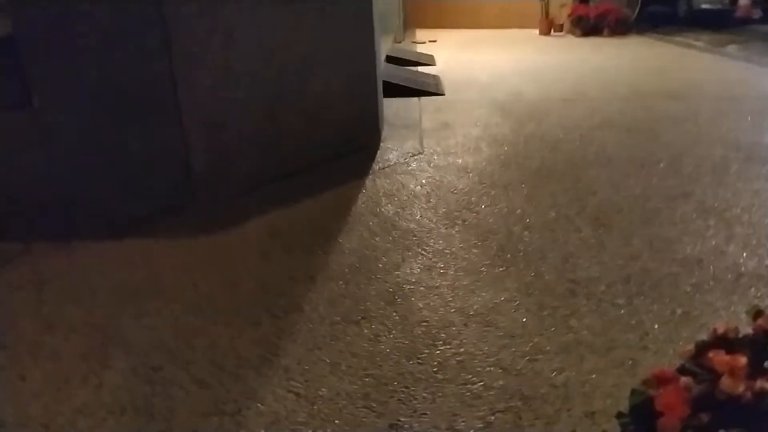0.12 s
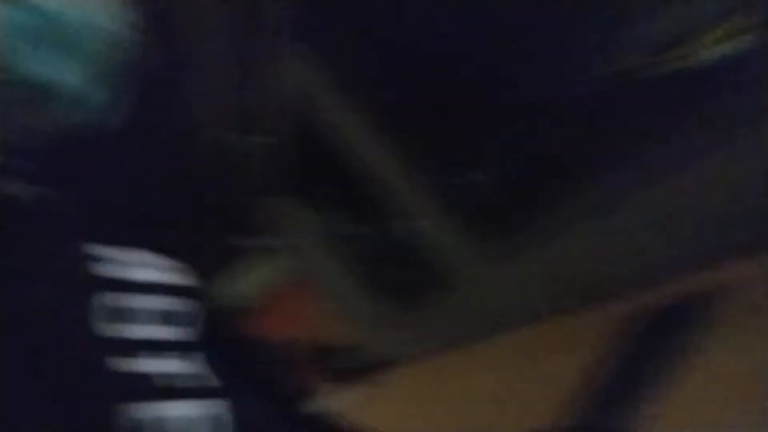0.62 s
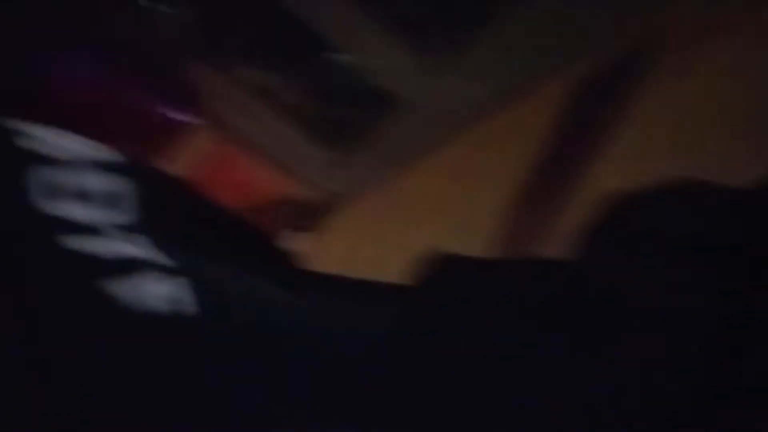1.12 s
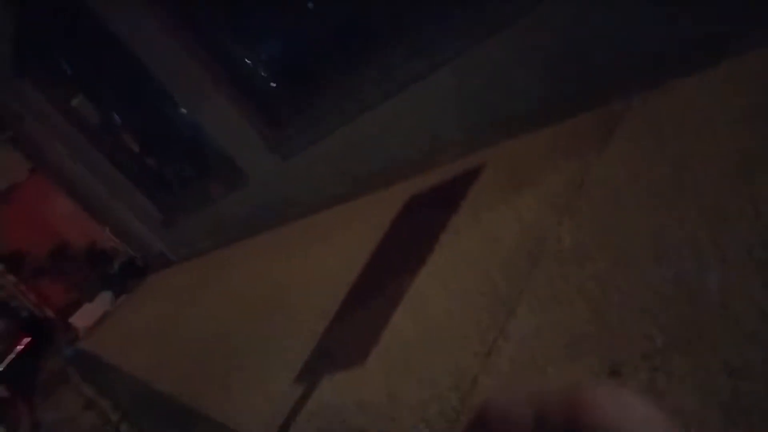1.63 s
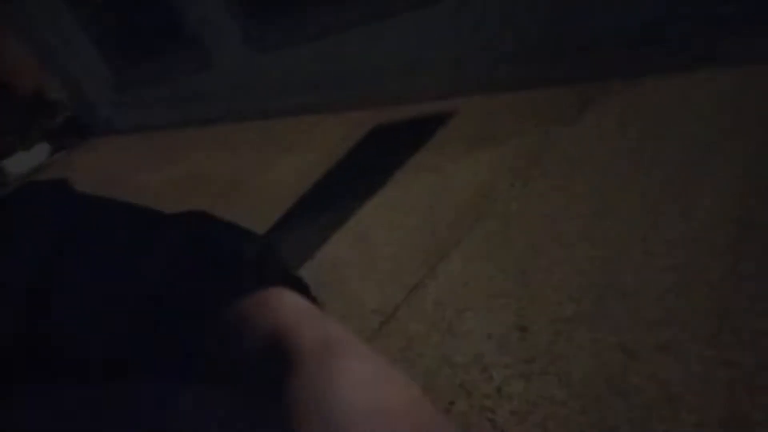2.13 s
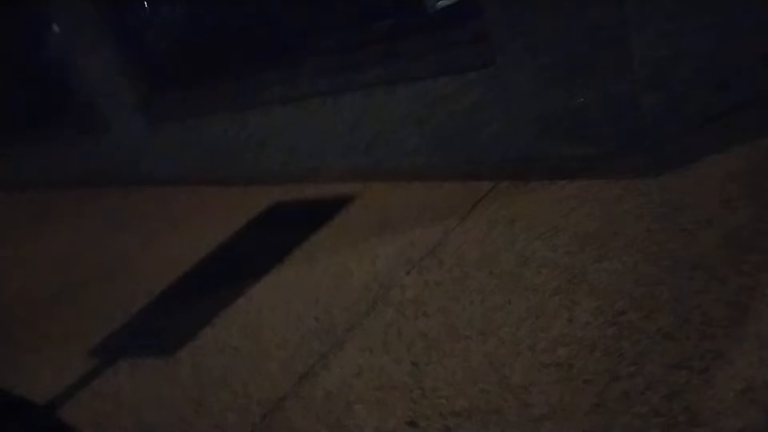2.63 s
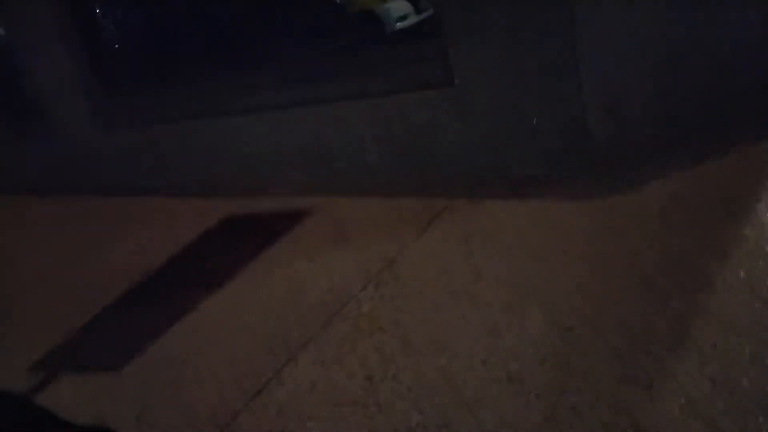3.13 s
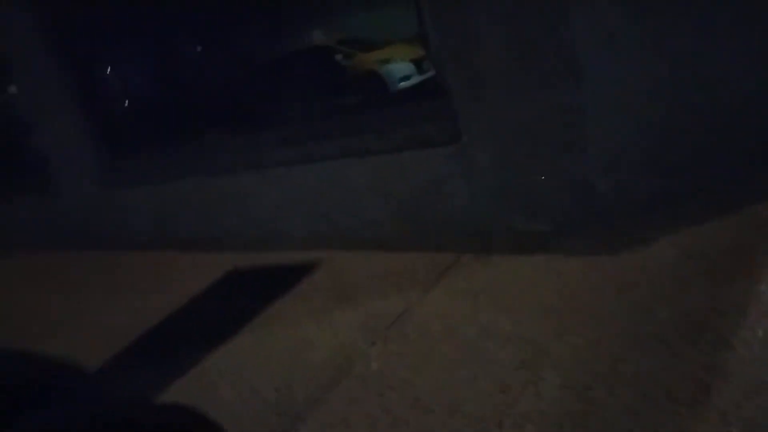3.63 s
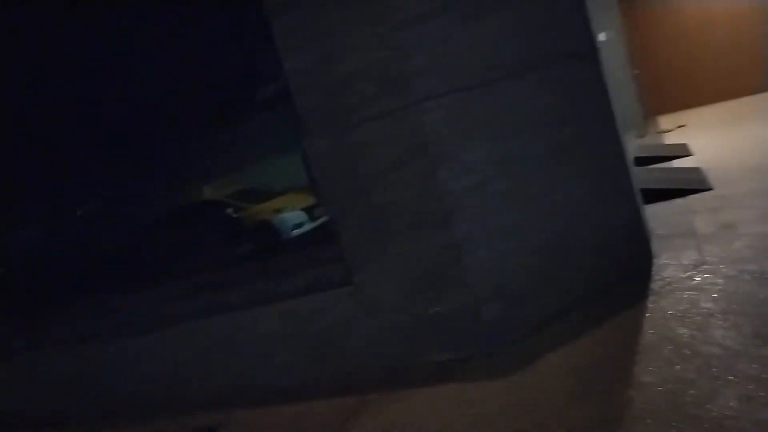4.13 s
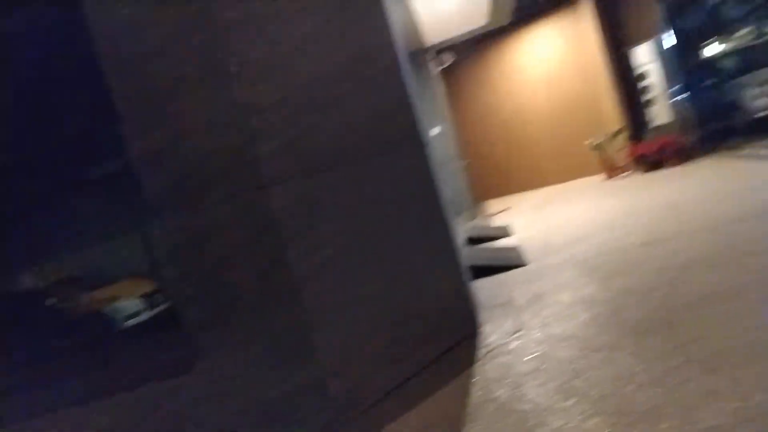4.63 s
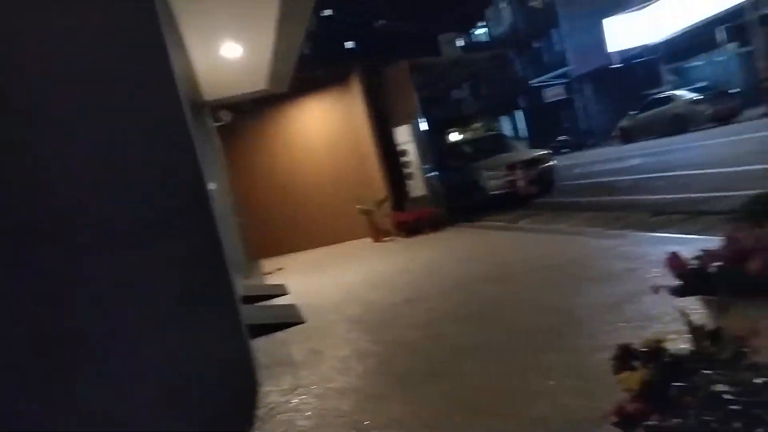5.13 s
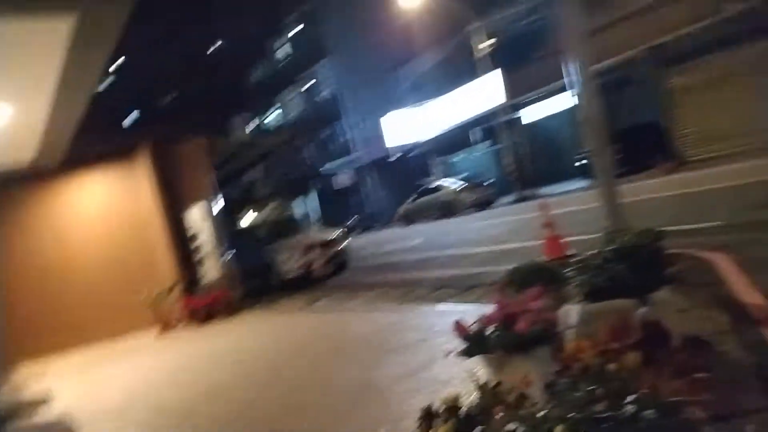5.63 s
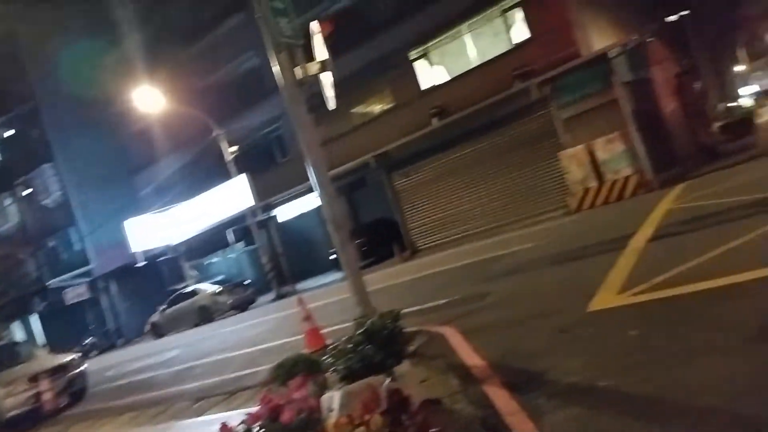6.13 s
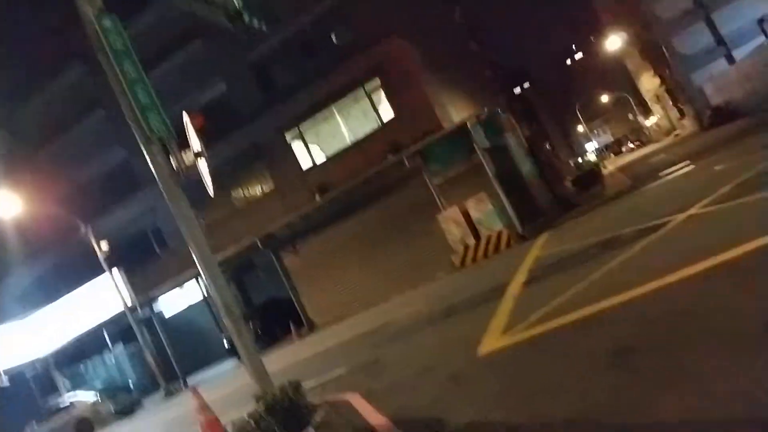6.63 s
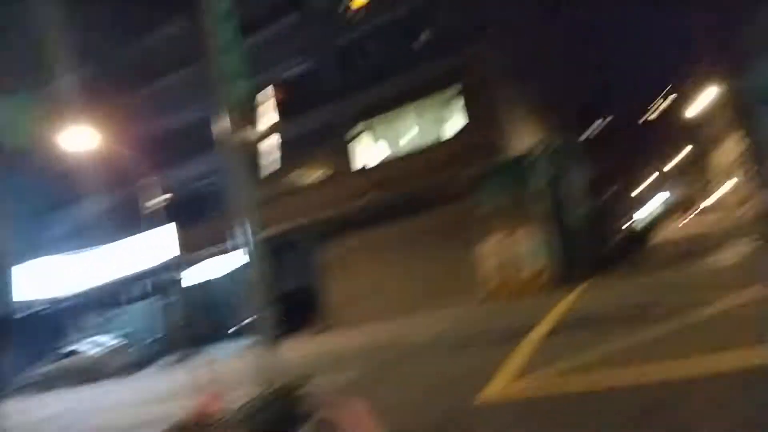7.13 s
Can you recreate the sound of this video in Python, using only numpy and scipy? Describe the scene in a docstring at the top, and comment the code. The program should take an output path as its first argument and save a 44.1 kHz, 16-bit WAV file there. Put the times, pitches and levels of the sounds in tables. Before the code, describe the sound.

Close cloth scraping and brushing, hard taps on a phone case and one hollow clasp clack, above a quiet street's distant low noise.

```python
"""Cloth and a bag rustle and scrape as a phone is carried by hand in a quiet street at night: friction noise in strokes.
The hand knocks on the case (damped modes) and creaks; folds snap (noise bursts around single cracks).
A clasp clacks (rattled modes), skin squeaks once (a rough upward glide), and air thumps on two microphone
ports (low noise). Behind lie a thin whine (a wavering sine) and distant traffic and fans (smooth noise)."""
import sys
import numpy as np
from scipy import signal
from scipy.fft import rfft, irfft, next_fast_len
from scipy.io import wavfile
from scipy.ndimage import uniform_filter1d

SR = 44100
rng = np.random.default_rng(int(sys.argv[2]) if len(sys.argv) > 2 else 0)


def output_pcm(signal):
    """Save a mono or channel-first signal as 16-bit PCM at the path in sys.argv[1].

    Samples are clipped to [-1, 1] before scaling.
    """
    pcm = np.clip(np.atleast_2d(signal).T, -1, 1) * 32767
    wavfile.write(sys.argv[1], SR, np.round(pcm).astype(np.int16))


def natural_amplitude(level_db):
    """Convert a level in decibels to a linear amplitude factor, elementwise."""
    exponent = np.asarray(level_db, float) / 20
    return 10 ** exponent


N = 320163  # length of the scene in samples

# Modes of the phone case: (frequency [Hz], level [dB], t60 [s])
CASE_MODES = [(321.5, -5, 0.15), (520, -1, 0.11), (764, -13.5, 0.15)]
# How the phone is turned to the clothes: (time [s], lag of left port [samples], left minus right [dB])
PHONE_TURN = [(0, 16, -4), (1.2, 25, -9), (1.7, -6, -7), (2.2, 9, -5.5), (3.3, -0.5, -0.5), (4.2, -4.5, -4),
              (5.7, -14, 2.5), (7.2, 11, -9.5)]


def evened(x):
    """Normalisation: scales to an rms of 1."""
    return x / np.sqrt(np.mean(x ** 2) + 1e-20)


def curve(rows, size=N):
    """Linear interpolation: every column of a time table at size even steps."""
    times, *columns = np.transpose(rows)
    steps = np.linspace(0, N / SR, size)
    return [np.interp(steps, times, column) for column in columns]


def read(points, hz):
    """Spectral interpolation: reads a table on a log-frequency axis."""
    frequency, value = np.transpose(points)
    return np.interp(np.log(hz + 1), np.log(frequency + 1), value)


def sides(balance_db):
    """Intensity stereo: gains of the left and right port, left minus right being balance_db."""
    return natural_amplitude(np.array([balance_db, -balance_db]) / 2)


def add(mix, start_s, sound):
    """Superposition: adds a two-port sound into the mix from start_s on."""
    part = mix[:, round(start_s * SR):][:, :sound.shape[1]]
    part += sound[:, :part.shape[1]]


def coloured(x, gain_db):
    """Linear filtering: multiplies the spectrum by a function of frequency giving dB."""
    size = next_fast_len(x.shape[-1])
    gain = natural_amplitude(gain_db(np.fft.rfftfreq(size, 1 / SR)))
    return irfft(rfft(x, size) * gain, size)[..., :x.shape[-1]]


def ring(hz, t60, rise):
    """Damped oscillation: one mode dying by 60 dB in t60 s, with a soft start of time constant rise s."""
    t = np.arange(SR // 5) / SR
    decay = natural_amplitude(-60 * t / max(t60, 0.005))
    return decay * (1 - np.exp(-t / rise)) * np.sin(2 * np.pi * hz * t)


def flicker(size, depth_db):
    """Random modulation: a gain that wanders by chance, holding for about size samples."""
    smooth = uniform_filter1d(rng.standard_normal(N), size)
    smooth = uniform_filter1d(smooth, size)
    return natural_amplitude(depth_db * evened(smooth))


def ports(alike, a, b):
    """Partial coherence: the left port hears the right one's sound late or early, plus its own."""
    lag = np.round(curve(PHONE_TURN)[0])
    late = np.interp(np.arange(N) - lag, np.arange(N), a)
    alike = np.clip(alike, 0, 1)
    left = alike * late + np.sqrt(1 - alike ** 2) * b
    return np.array([left, a])


def crackle(per_s, spread_db, share):
    """Stick-slip friction: smooth noise plus many tiny ticks as fibres let go, a few of them large."""
    heights = natural_amplitude(spread_db * np.minimum(rng.exponential(1, (2, N)), 5))
    ticks = (rng.random((2, N)) < per_s / SR) * heights
    puff = np.exp(-np.arange(120) / 11.4) * rng.standard_normal(120)
    grains = signal.oaconvolve(ticks, puff[None], axes=1)[:, :N]
    return rng.standard_normal((2, N)) + share * evened(grains)


def patchy(x, spectrum):
    """Time-varying filtering: colours x while patches of about 1 kHz by 30 ms swell and sink."""
    hz, _, z = signal.stft(x, SR, nperseg=256, noverlap=192)
    patches = uniform_filter1d(rng.standard_normal(z.shape[1:]), size=6, axis=0)
    patches = evened(uniform_filter1d(patches, size=20, axis=1))
    gain = natural_amplitude(read(spectrum, hz)[:, None] + 2 * patches)
    return evened(signal.istft(z * gain, SR, nperseg=256, noverlap=192)[1][:, :N])


def friction():
    """Energy addition: the powers of steady sliding and of each swelling stroke sum to two gains."""
    # Steady sliding of cloth: (time [s], hiss level [dB], scraping level [dB])
    sliding = [(0, -56.5, -54), (0.5, -50.5, -77), (1.23, -59.5, -91), (1.4, -44.5, -57),
               (2.12, -51, -55.5), (3.1, -42, -46), (3.29, -46.5, -58.5), (3.75, -45, -53.5),
               (4.9, -51.5, -62), (5.95, -55, -54), (6.35, -45, -51), (7.26, -66, -67)]
    # Strokes of cloth and hand: (time of peak [s], length [s], hiss level [dB], scraping level [dB])
    strokes = [(0.639, 0.16, -44, -62), (1.339, 0.25, -65, -44), (1.481, 0.098, -39, -52),
               (1.785, 0.09, -48, -41), (2.156, 0.05, -28, -28), (2.22, 0.06, -32, -34.5),
               (2.29, 0.28, -42.5, -41), (2.676, 0.41, -37.5, -42.5), (2.896, 0.19, -34.5, -39.5),
               (2.956, 0.12, -30, -31), (3.169, 0.054, -29.5, -37), (3.39, 0.24, -42.5, -45),
               (3.682, 0.41, -49.5, -45), (3.966, 0.19, -40.5, -38.5), (4.087, 0.22, -39.5, -48),
               (4.446, 0.15, -44, -40.5), (4.546, 0.16, -40, -42), (5.115, 0.16, -53, -46),
               (5.342, 0.19, -41, -41), (5.524, 0.1, -30, -34), (5.777, 0.23, -46.5, -69),
               (6.248, 0.089, -42, -39.5), (6.881, 0.29, -42, -46), (7.07, 0.28, -51, -54)]
    swell_share, ends_db = 0.48, -28.5  # share of length spent swelling; level at both ends re peak
    t = np.arange(N) / SR
    power = natural_amplitude(np.array(curve(sliding))) ** 2
    for peak_s, length, *levels_db in strokes:
        near = slice(round((peak_s - length) * SR), round((peak_s + length) * SR))
        flank = np.where(t[near] < peak_s, -swell_share, 1 - swell_share)
        away = (t[near] - peak_s) / length / flank  # 0 at the peak, 1 at either end
        stroke_db = np.array(levels_db)[:, None] + ends_db * away ** 1.47
        power[:, near] += natural_amplitude(stroke_db) ** 2
    return np.sqrt(power)


def rustle():
    """Friction noise: sliding cloth hisses in strokes, almost unlike at the two ports."""
    # Fine hiss of cloth: (frequency [Hz], relative level [dB per Hz])
    cloth = [(2500, 2.5), (8500, 12), (11900, 10), (14000, -8)]
    sound = patchy(ports(0.057, *crackle(1200, 5.0, 0.2)), cloth)
    hiss_gain = friction()[0]
    return sound * flicker(size=300, depth_db=2.0) * hiss_gain * sides(curve(PHONE_TURN)[1])


def rubbing():
    """Forced vibration: gritty scraping of cloth and skin over the case also shakes its modes."""
    # Grit of the scraping: (frequency [Hz], relative level [dB per Hz])
    scrape = [(120, -13), (300, 14), (800, 15), (2200, 7.5), (5000, 0.5), (7500, -45), (16000, -49)]
    # the case dies away faster here than when knocked
    body = sum(natural_amplitude(db) * ring(hz, 0.14 * t60, 0.018) for hz, db, t60 in CASE_MODES)
    drive = ports(0.19, *crackle(400, 3.74, 0.95)) * flicker(size=250, depth_db=3.0)
    modes = signal.oaconvolve(drive, body[None] - body.mean(), axes=1)[:, :N]
    sound = patchy(drive, scrape) + 0.89 * evened(modes)
    scraping_gain = friction()[1]
    return sound * scraping_gain * sides(curve(PHONE_TURN)[1])


def case_response(luck):
    """Modal superposition: all case modes, their levels and pitches varied by chance."""
    modes = zip(CASE_MODES, luck)
    return sum(natural_amplitude(db + 3 * r) * ring(hz * (1 + r / 30), t60, 0.003) for (hz, db, t60), r in modes)


def knocks():
    """Impact excitation: a chattering contact rings the struck spot and, behind it, the case modes."""
    # Knocks: (time [s], two-port mean peak before balance [dB], pitch of spot [Hz], left minus right [dB])
    knock_rows = [(0.743, -39, 322, -4), (1.253, -37.5, 240, -16.5), (1.638, -28.5, 424, -7),
                  (1.756, -16.5, 693, -10), (2.1419, -28, 520, -8), (2.162, -13.5, 546, -3),
                  (2.167, -22, 470, -20), (2.177, -19, 520, 8), (2.249, -25.5, 285, -9),
                  (2.387, -33, 290, -18), (2.5746, -26.5, 297, -15.5), (2.598, -21.5, 294, -16),
                  (2.675, -30.5, 239, -15.5), (2.6895, -25.5, 980, -16), (2.763, -32.5, 326, -15),
                  (2.937, -19, 280, -7), (2.9768, -23, 320, -2), (3.048, -30.5, 290, -8),
                  (3.1714, -12, 610, 9), (3.1765, -21, 342, -5), (3.5817, -29.5, 503, -11),
                  (3.6753, -26, 322, -13.5), (4.376, -29, 370, -11), (4.386, -29, 452, -12.5),
                  (4.4601, -17, 520, -11), (4.465, -25, 740, -9), (4.909, -25, 316, 8),
                  (5.08, -37.5, 480, -10), (5.333, -31, 369, -12), (5.348, -31.5, 516, -10),
                  (5.5074, -21, 332, 3)]
    out = np.zeros((2, N))
    luck = rng.standard_normal((len(knock_rows), 2, len(CASE_MODES)))
    chatter = 0.025 * rng.standard_normal((len(knock_rows), 1, 1200)) * np.exp(-np.arange(1200) / 300)
    chatter[:, :, 0] = 1  # the first contact
    for (start_s, db, hz, balance_db), port_luck, touch in zip(knock_rows, luck, chatter):
        spot = ring(hz, 14 / hz, 0.4 / hz) + 0.75 * ring(1.663 * hz, 8 / hz, 0.4 / hz)
        body = np.array([case_response(row) for row in port_luck])
        sound = signal.fftconvolve(spot + 0.093 * body, touch, axes=1)
        sound = sound / abs(sound.mean(0)).max()
        add(out, start_s, natural_amplitude(db) * sound * sides(balance_db)[:, None])
    return out


def creak():
    """Stick-slip: a row of single slips, each a short damped ring."""
    # Slips: (time [s], peak before balance [dB])
    slip_rows = [(3.335, -37.5), (3.353, -36), (3.401, -35), (3.423, -34), (3.469, -33)]
    out = np.zeros((2, N))
    slip = ring(1140, 0.0087, 0.0003)
    for start_s, db in slip_rows:
        add(out, start_s, natural_amplitude(db) * slip / slip.max() * sides(9.6)[:, None])
    return out


def snaps():
    """Impulsive radiation: each fold gives one crack in a brief noise burst; dull ones start abruptly."""
    # Snaps: (time of peak [s], two-port mean peak before balance [dB], filter gain at 9 kHz [dB],
    # time constant of fade [ms])
    snap_rows = [(1.6378, -12, 13, .7), (1.7413, -20, 22, .5), (1.7566, -4.5, 9, 0.4),
                 (1.771, -20, 10, 1.3), (1.993, -21, 14, .6), (2.022, -27, 18, .7), (2.139, -20, 16, .7),
                 (2.144, -4, 24, .6), (2.1617, -2, 15, .8), (2.206, -14.5, 13, 0.91), (2.223, -20, 24, 2.5),
                 (2.2872, -22, 6, 4.3), (2.6145, -3, 30, 0.51), (2.6897, -18, 6, 0.6),
                 (2.758, -19.5, 10, 2.5), (2.9394, -16, 11, 0.88), (3.171, -4, 34, .9),
                 (3.4013, -21.5, 15, .8), (3.581, -22, -6.5, 2.6), (4.303, -26.5, 3, 1.7),
                 (4.388, -27, 16, 1.5), (4.398, -28, 18, 2), (4.446, -25, 6, 1.2), (4.5359, -26, -19, 0.68),
                 (4.9085, -33, -12, 3), (5.5057, -20, -4, 1.5), (6.214, -19, 8.5, 1.5),
                 (6.248, -20.5, 11, 2), (6.873, -14, 16, 1.8)]
    crack_height = 1.77  # over the rms of the burst noise at its peak
    out, t = np.zeros((2, N)), np.arange(-800, 1200) / SR
    for peak_s, db, bright_db, fade_ms in snap_rows:
        rise = np.clip(0.5 + bright_db / 20, 0.1, 1)  # rise time as a share of the fade
        shape = np.exp(-1000 * abs(t) / fade_ms / np.where(t < 0, rise, 1))
        a, b = rng.standard_normal((2, len(t)))
        noise = np.array([a, 0.6 * a + 0.8 * b])
        burst = shape * (noise + crack_height * (t == 0))
        burst = coloured(burst, lambda hz: read([(600, 1.0), (2000, 7.4), (9000, bright_db)], hz))
        add(out, peak_s + t[0], natural_amplitude(db) * burst / abs(burst.mean(0)).max())
    return out * sides(curve(PHONE_TURN)[1])


def clack():
    """Modal impact: rattling contact shakes the hollow clasp's modes, then damps them; high ones die first."""
    # The clasp shuts: start [s], length of rattle [s], peak before balance [dB], left minus right [dB]
    clack_row = (3.8612, 0.008, -15, -7)
    # Modes of the clasp: (frequency [Hz], level [dB])
    clasp_modes = [(1195, 0), (1998, -4), (2924, -8), (3363, -8), (5090, -14), (7350, -12), (8800, -12)]
    start_s, length, db, balance_db = clack_row
    out, t = np.zeros((2, N)), np.arange(SR // 20) / SR
    hold = natural_amplitude(-60 * np.maximum(t - length, 0) / 0.028)  # full during the rattle, then damped
    modes = sum(natural_amplitude(level_db) * ring(hz, 80 / hz, 2.5 / hz)[:len(t)] for hz, level_db in clasp_modes)
    grit_points = [(600, -30), (1600, 0), (5000, -8), (6000, -30)]  # (frequency [Hz], gain [dB])
    grit = coloured(rng.standard_normal(len(t)), lambda hz: read(grit_points, hz))
    sound = hold * (modes + 0.5 * grit * np.minimum(t / 0.002, 1))
    add(out, start_s, natural_amplitude(db) * sound / abs(sound).max() * sides(balance_db)[:, None])
    return out


def squeak():
    """Frequency modulation: skin skids once, a short whistle gliding upward, roughened by pitch noise."""
    # The skid: start [s], length [s], first frequency [Hz], last frequency [Hz], peak before balance [dB]
    squeak_row = (2.58, 0.021, 2450, 4050, -41)
    start_s, length, from_hz, to_hz, db = squeak_row
    out = np.zeros((2, N))
    u = np.arange(0, 1, 1 / (length * SR))  # share of the length gone by
    rough = 1 + 0.25 * rng.standard_normal(len(u))
    turns = np.cumsum((from_hz + (to_hz - from_hz) * u) * rough) / SR
    tone = np.sin(np.pi * u) * np.sin(2 * np.pi * turns)
    add(out, start_s, natural_amplitude(db) * tone * sides(-15)[:, None])
    return out


def air():
    """Turbulent pressure: moving air thumps in lumps of low noise on each port by itself."""
    # Air on the ports: (time [s], rms level before balance [dB])
    air_level = [(0, -70), (5.05, -66.5), (5.18, -48), (5.23, -54), (5.26, -42), (5.39, -52), (5.43, -45),
                 (5.59, -49), (5.7, -62), (7.1, -58), (7.16, -44), (7.26, -44)]
    gusts = [flicker(size=800, depth_db=3) for port in "LR"]
    lumps = rng.standard_normal((2, N)) * gusts
    low = coloured(lumps, lambda hz: read([(15, -55), (45, -4.5), (150, -4.5), (800, -55)], hz))
    return evened(low) * natural_amplitude(curve(air_level)[0]) * sides(-5)[:, None]


def whine():
    """Phase integration: a thin tone that wavers a little in pitch and level, the same at both ports."""
    # Whine: (time [s], rms level before wavering [dB])
    whine_level = [(4.55, -88), (4.7, -70), (5.05, -69), (5.15, -85), (6.05, -82), (6.13, -68), (7.15, -67),
                   (7.22, -85)]
    centre_hz = 2636
    turns = np.cumsum(centre_hz * flicker(size=1500, depth_db=0.008)) / SR
    tone = np.sin(2 * np.pi * turns) * flicker(size=2000, depth_db=1.2)
    return np.sqrt(2) * natural_amplitude(curve(whine_level)[0]) * np.array([tone, tone])


def street():
    """Diffuse-field coherence: distant traffic and fans as smooth noise, alike in both ports only in the bass."""
    # Street noise: (frequency [Hz], relative level [dB per Hz])
    street_spectrum = [(25, -11.5), (178, -1.5), (449, -5), (1510, -19.5), (9190, -25), (11900, -16.5),
                       (14000, -3.5), (16500, -22)]
    # Likeness of left and right: (frequency [Hz], correlation [-1 to 1])
    likeness = [(60, 1), (380, 0.67), (2380, -0.14)]
    level_db = -46  # rms
    a, b = rng.standard_normal((2, N))
    size = next_fast_len(N)
    same = np.clip(read(likeness, np.fft.rfftfreq(size, 1 / SR)), -1, 1)
    right = irfft(same * rfft(a, size) + np.sqrt(1 - same ** 2) * rfft(b, size), size)[:N]
    noise = coloured(np.array([a, right]), lambda hz: read(street_spectrum, hz))
    return natural_amplitude(level_db) * evened(noise)


def scene():
    """Superposition: all sources add at the two ports."""
    handling = rustle() + rubbing() + knocks() + creak() + snaps() + clack() + squeak()
    return handling + air() + whine() + street()


def top_cut(x):
    """Nothing passes above the cut-off."""
    return signal.sosfilt(signal.butter(12, 16470, fs=SR, output="sos"), x)


def record(dry):
    """Linear filtering: the deepest bass is reduced, a narrow gap cut above 12 kHz, the treble above it weakened."""
    # Response: (frequency [Hz], gain [dB])
    response = [(12, -20), (30, 0), (11950, 0), (12250, -55), (13800, -15), (15600, -24), (16500, -60)]
    mix = coloured(dry, lambda hz: read(response, hz))
    return top_cut(mix)


dry = scene()
out = record(dry)
output_pcm(out)
```